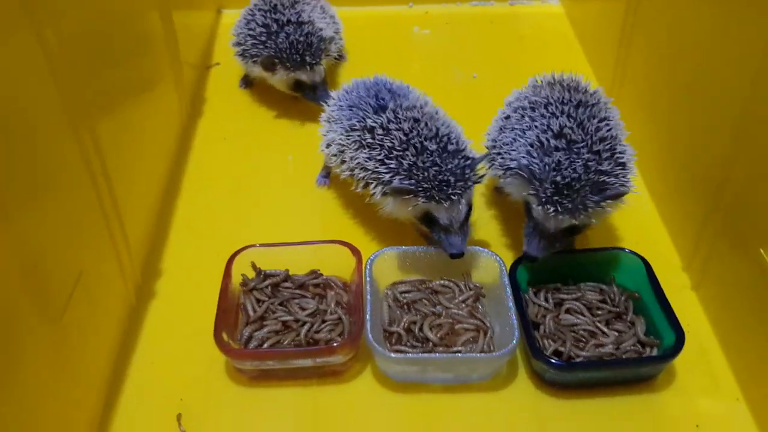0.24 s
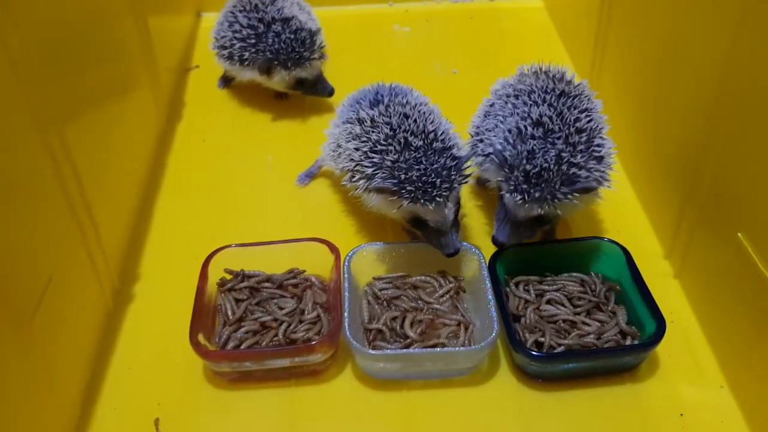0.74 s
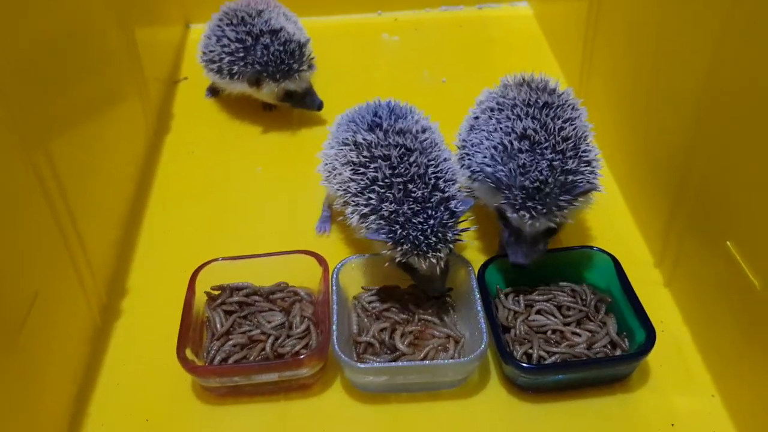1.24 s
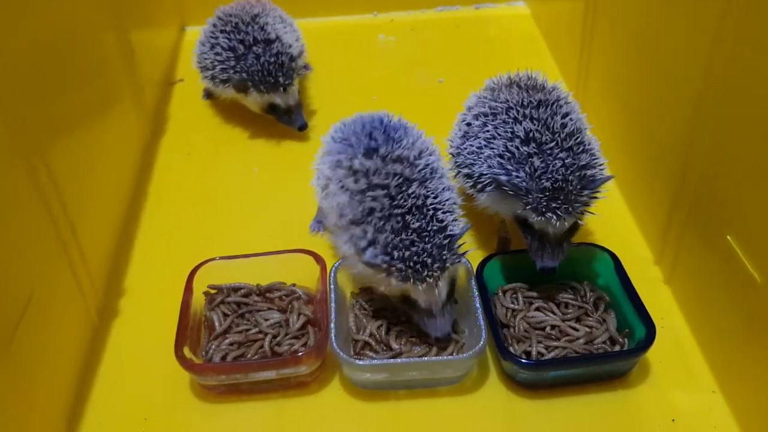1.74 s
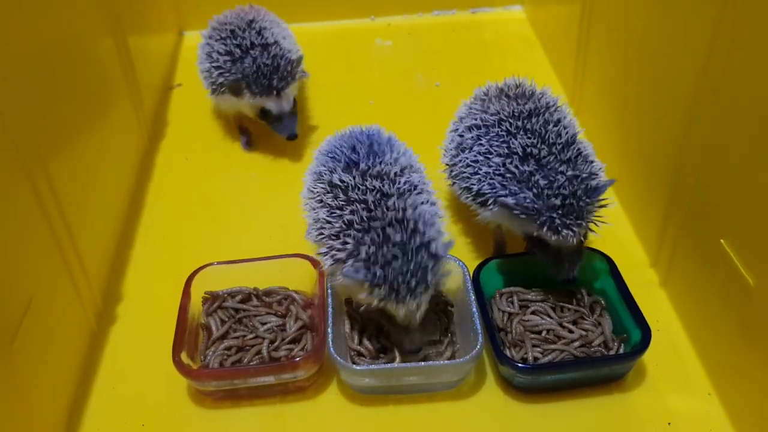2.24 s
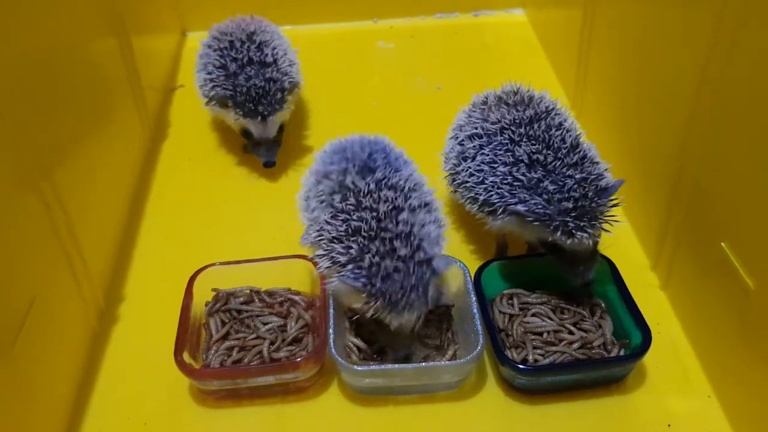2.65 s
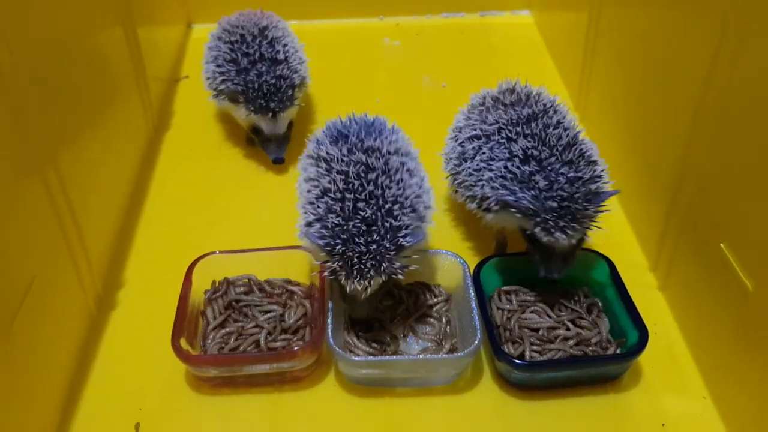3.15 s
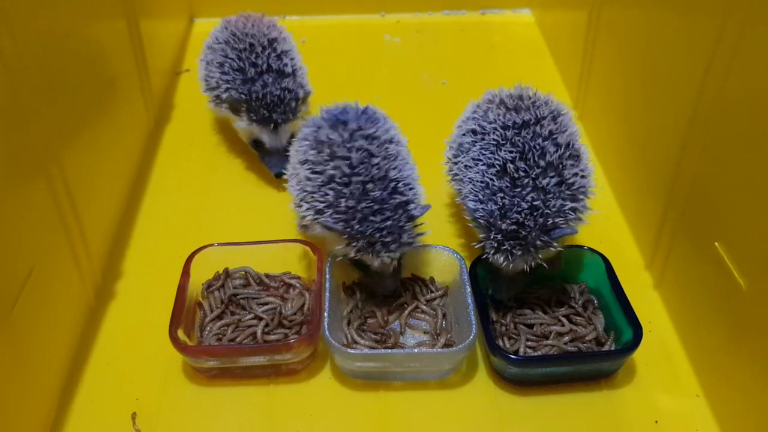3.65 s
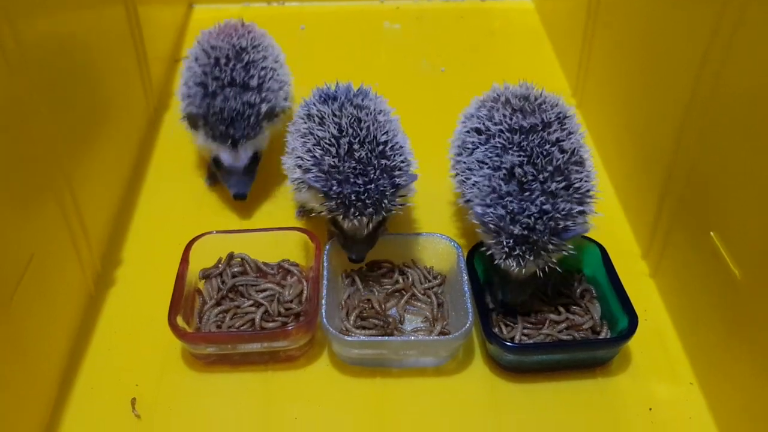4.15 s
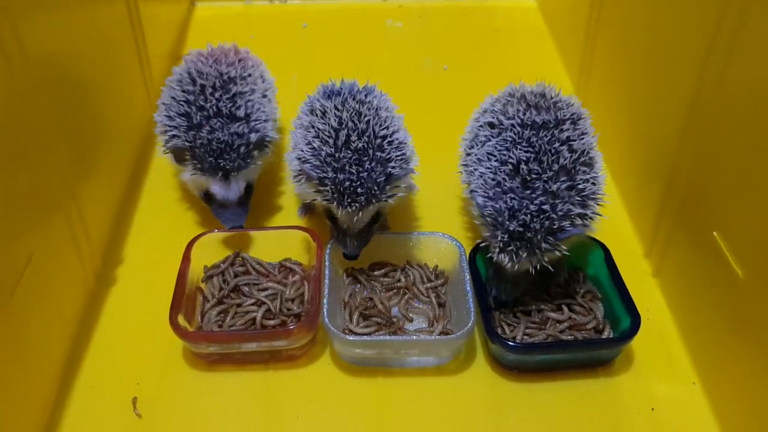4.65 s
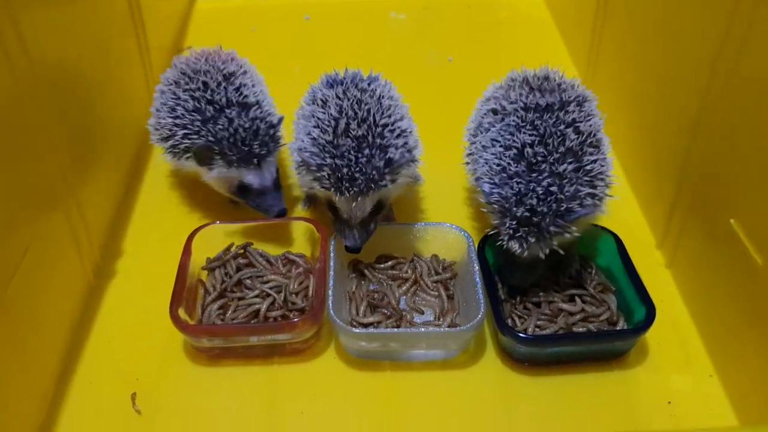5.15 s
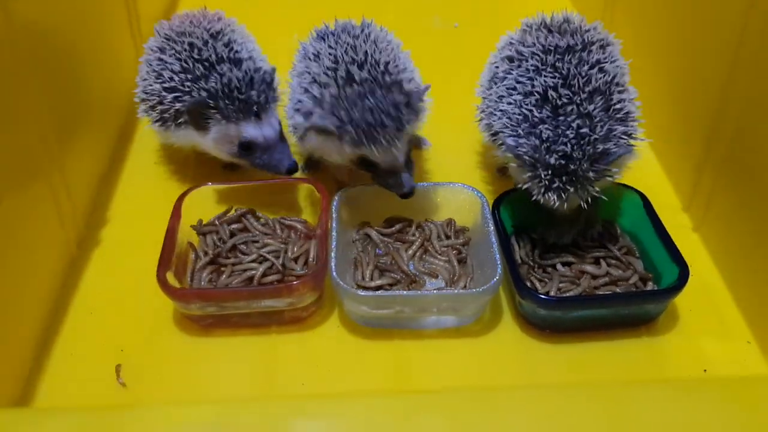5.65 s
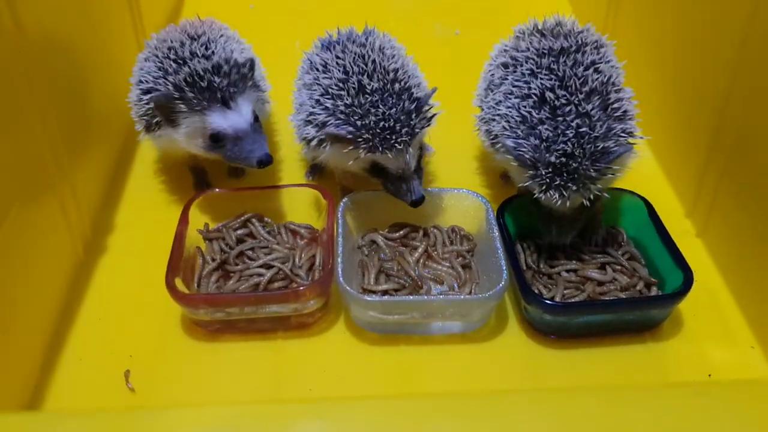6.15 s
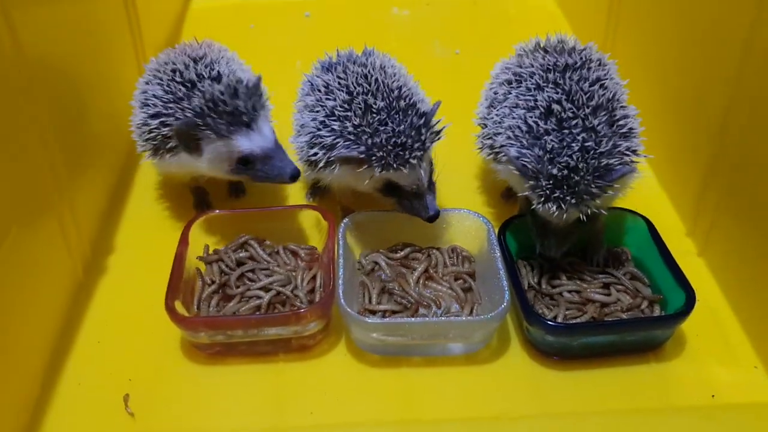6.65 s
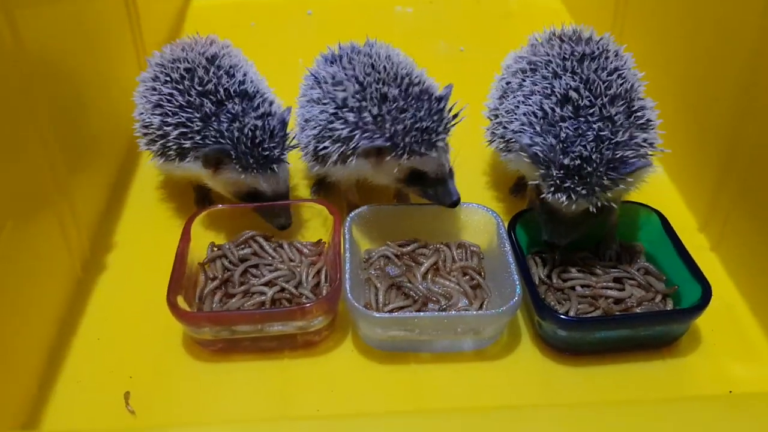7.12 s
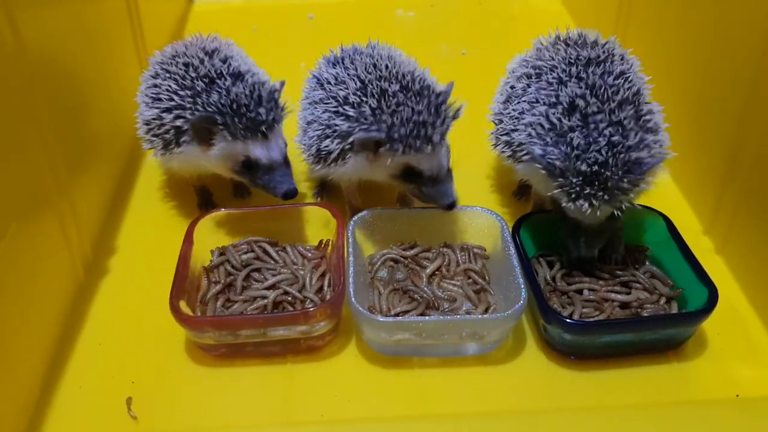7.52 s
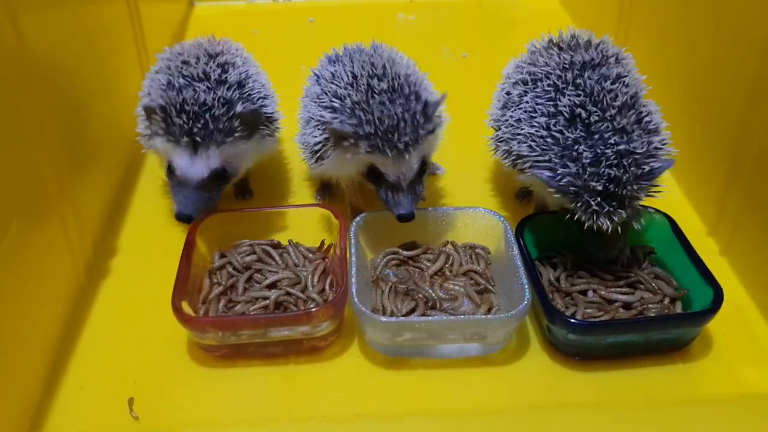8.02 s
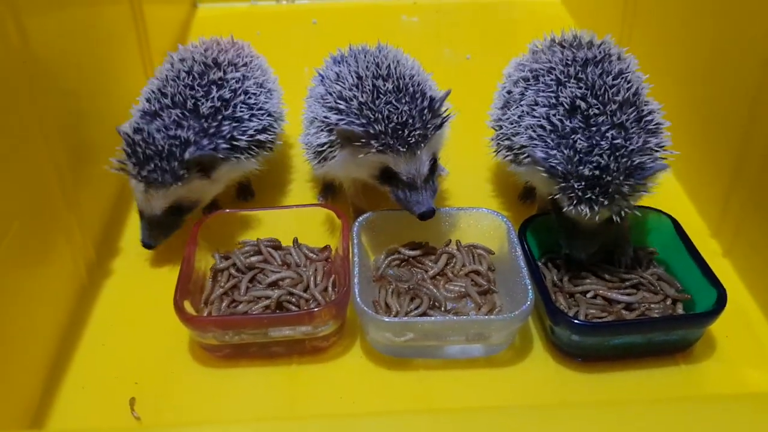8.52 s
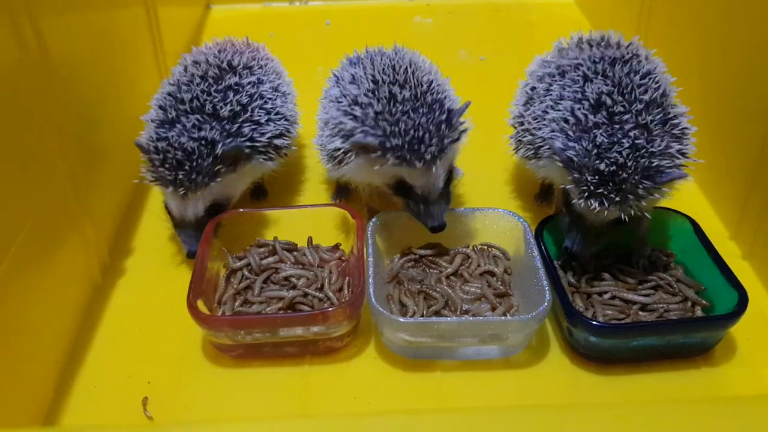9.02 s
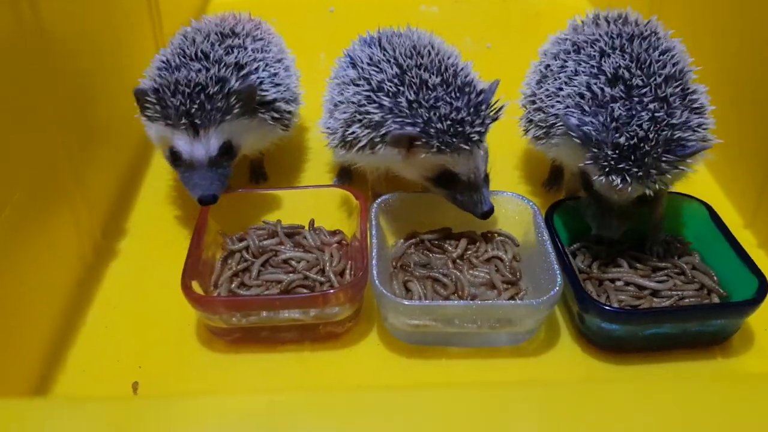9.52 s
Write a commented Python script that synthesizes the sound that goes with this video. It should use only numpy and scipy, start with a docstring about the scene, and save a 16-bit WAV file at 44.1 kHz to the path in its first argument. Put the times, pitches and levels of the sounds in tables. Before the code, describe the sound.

Small crisp chewing and dry rustling from feeding hedgehogs, with light dish knocks, a humming fan and three late microphone bumps.

```python
"""Three hedgehogs crunch dried mealworms, their teeth cracking the brittle shells.
They eat from small dishes in a plastic tub: snouts sniff, dig in the heap, snap dry worms
and nudge the dishes against the tub floor. Behind them, air rushes and a fan hums and whines.
Late on, three taps land on the camera by its left microphone, and its automatic volume
control turns everything down a little."""
import sys
import numpy as np
from scipy import signal
from scipy.fft import rfft, irfft, next_fast_len
from scipy.io import wavfile

SR = 44100
rng = np.random.default_rng(int(sys.argv[2]) if len(sys.argv) > 2 else 0)


def store_wav(level_fs):
    """Save 16-bit WAV to argv[1]."""
    pcm = np.round(np.clip(np.atleast_2d(level_fs), -1, 1) * 32767)
    wavfile.write(sys.argv[1], SR, pcm.T.astype(np.int16))


N = 431298
TIME = np.arange(N) / SR
SHORT = TIME[:8192]  # the clock for one short sound, in seconds


def undb(db):
    """Turn decibels into a number to multiply by."""
    return 10 ** (np.asarray(db) / 20)


def unit(x):
    """Scale a sound so its average strength (rms) is 1."""
    return x / np.sqrt(np.mean(x ** 2))


def peak(x):
    """Scale a sound so its biggest swing is 1."""
    return x / np.abs(x).max()


def curve(rows):
    """Join (time_s, value) points with straight lines."""
    return np.interp(TIME, *np.transpose(rows))


def by_pitch(rows, f):
    """Read between (pitch_hz, value) points, giving each octave equal room."""
    hz, value = np.transpose(rows)
    return np.interp(np.log(f), np.log(hz), value)


def shape(x, response):
    """Filter a sound: response(f) says how much of each frequency gets through."""
    size = next_fast_len(x.shape[-1], True)
    f = np.maximum(np.fft.rfftfreq(size, 1 / SR), 1)
    return irfft(rfft(x, size) * response(f), size)[..., :x.shape[-1]]


def resonance(f, hz, width):
    """Favour the frequencies near hz, as a ringing object does; narrower rings longer."""
    return 1 / (1 + 1j * (f * f - hz * hz) / (f * width))


def soften(x, hz):
    """Smooth away what lies above hz, as a soft contact does."""
    return signal.sosfilt(signal.butter(2, min(hz, SR / 3), fs=SR, output="sos"), x)


def fade(fade_s):
    """Die away by 60 dB in fade_s seconds."""
    return np.exp(-np.log(1000) * SHORT / fade_s)


def waver(rate_hz):
    """A smooth random wobble, about 1 in size."""
    return unit(shape(rng.standard_normal(N), lambda f: np.exp(-(f / rate_hz) ** 2)))


def pan(left_db):
    """Make the left ear left_db louder than the right."""
    return undb(np.array([[left_db], [-left_db]]) / 2)


def add(track, start_s, sound):
    """Mix a sound into the track at start_s."""
    start = int(start_s * SR)
    track[:, start:start + sound.shape[-1]] += sound[..., :N - start]


def grains(size, per_s, spread_db):
    """Tiny clicks of uneven strength at random moments."""
    strengths = undb(spread_db * np.minimum(rng.exponential(size=size), 4))
    return (rng.random(size) < per_s / SR) * strengths * rng.standard_normal(size)


def tub_echo(x, walls_db, walls_fade_s, room_db, room_fade_s):
    """Add quick echoes off the tub walls, then the faint room; each ear hears its own."""
    walls = rng.standard_normal((2, len(SHORT))) * fade(walls_fade_s) * (SHORT > .001)
    room = rng.standard_normal((2, len(SHORT))) * fade(room_fade_s) * (SHORT > .01)
    echo = undb(walls_db) * unit(walls) + undb(room_db) * unit(room)
    return x + signal.fftconvolve(x, echo / np.sqrt(len(SHORT)), axes=-1)[:, :N]


# How alike the room sounds in the two ears: pitch_hz, likeness (1 = the same)
EAR_LIKENESS = [(60, 0.98), (290, 0.85), (640, 0.3), (1300, 0.023)]
def room_noise(response):
    """Filtered noise whose low notes are alike in both ears and whose high notes are not."""
    shared = shape(rng.standard_normal(N), lambda f: response(f) * np.sqrt(1 + by_pitch(EAR_LIKENESS, f)))
    apart = shape(rng.standard_normal(N), lambda f: response(f) * np.sqrt(1 - by_pitch(EAR_LIKENESS, f)))
    return unit(np.array([shared + apart, shared - apart]))


# The air's balance of low and high: pitch_hz, relative_db
AIR_BALANCE = [(20, -40), (32, -23), (50, -5.5), (92, -2.5), (155, -1.5), (260, -6), (440, -17), (590, -17),
               (760, -16), (2250, -15.5), (3400, -32.5), (6800, -31.5), (8600, -49.5), (11500, -40),
               (14500, -87)]
# The depth of a hollow in the air's sound: time_s, change_db
AIR_HOLLOW = [(0, -1), (4.6, -4), (6.2, -10), (9.78, -10.5)]
def room_air(level_db=-46):
    """Air rushes softly; a narrow hollow in its middle range deepens halfway through."""
    air = undb(level_db) * room_noise(lambda f: undb(by_pitch(AIR_BALANCE, f)))
    middle = shape(air, lambda f: resonance(f, hz=587, width=100))
    return air - (1 - undb(curve(AIR_HOLLOW))) * middle


# The bands of noise in the fan's drone: pitch_hz, width_hz, relative_db
FAN_BANDS = [(60.6, 8.3, -53.5), (109.7, 9.8, -51.5), (204, 4.8, -50), (236.7, 3.9, -57),
             (291.3, 9.2, -64.5), (326.8, 21, -57.5), (383, 7.2, -62.5), (410, 11, -65), (513, 22, -71),
             (779, 18, -65.5), (1707, 250, -60), (2350, 26, -63), (2802, 134, -67), (4890, 51, -73.5),
             (12150, 90, -88)]
# The fan's two strongest tones: pitch_hz, relative_db
FAN_TONES = [(202.5, -1), (236.3, -4)]
# The slow swell of those tones: time_s, level_db
FAN_SWELL = [(0, -49), (1.1, -50.5), (2.0, -46), (4.7, -48), (5.8, -43.5), (7.0, -43.5), (8.2, -47.5),
             (9.78, -44.5)]
def fan(drone_db=-46.5, wobble_hz=2.573):
    """A ventilation fan drones in narrow bands of noise and hums two wavering tones."""
    def bands(f):
        return np.sqrt(sum(undb(db) ** 2 / width * np.abs(resonance(f, hz, 1.31 * width)) ** 4
                           for hz, width, db in FAN_BANDS))

    drone = undb(drone_db) * room_noise(bands)
    tones = np.zeros(N)
    for pitch_hz, relative_db in FAN_TONES:
        strength = undb(relative_db + 3.2 * waver(6))
        cycles = np.cumsum(pitch_hz + wobble_hz * waver(12.84)) / SR
        tones += strength * np.sin(2 * np.pi * cycles)
    return drone + unit(tones) * undb(curve(FAN_SWELL) - 1) * pan(1)


# A thin whine that sinks away halfway through: time_s, level_db
WHINE_LEVEL = [(0, -76), (1.2, -70), (4.2, -68.5), (5.1, -71), (5.7, -76.5), (7.5, -85), (9.78, -80)]
def whine(pitch_hz=2805, wobble_hz=2.5, flutter_db=2):
    """One thin, slightly unsteady tone flutters differently in each ear."""
    cycles = np.cumsum(pitch_hz + wobble_hz * waver(11.2)) / SR
    tone = np.sqrt(2) * np.sin(2 * np.pi * cycles)
    flutter = np.array([waver(4.5), waver(15)])
    return tone * undb(curve(WHINE_LEVEL) + flutter_db * flutter)


# Taps on the camera: start_s, thump_db, thump_hz, thump_width_hz, hardness_hz, case_hz,
# case_width_hz, case_db, tube_db, scrape_db, scrape_delay_s, scrape_spread_s
CAMERA_TAPS = [(7.0755, -1.2, 400, 500, 9400, 1440, 3560, -12, -9.5, -31, .012, .019),
               (7.1468, -2.5, 350, 386, 3140, 5560, 3900, -9, -1, -49, .011, .02),
               (8.123, 2, 350, 160, 1590, 3950, 1500, -17.5, -26.5, -36, .014, .007)]
def camera_taps(right_db=-26, boom_db=-23, tube_lag_s=.0002, bounce_s=.0134, bounce_db=-21):
    """A tap thumps the left microphone, booms in the camera's body, ticks, bounces and slides off."""
    out = np.zeros((2, N))
    sides = undb([[0], [right_db]])
    for (start_s, thump_db, thump_hz, thump_width_hz, hardness_hz, case_hz, case_width_hz,
         case_db, tube_db, scrape_db, scrape_delay_s, scrape_spread_s) in CAMERA_TAPS:
        hit = -1. * (SHORT == 0)
        push = soften(soften(hit, hardness_hz), hardness_hz)
        boom = peak(shape(push, lambda f: resonance(f, 165, 130)))
        thump = peak(shape(push, lambda f: resonance(f, thump_hz, thump_width_hz))) + undb(boom_db) * boom
        # the case ticks first, then the tiny tube leading to the microphone
        case = shape(hit, lambda f: resonance(f, case_hz, case_width_hz) ** 2)
        tube = shape(hit, lambda f: resonance(f, 12300, 4900) ** 2 * np.exp(-2j * np.pi * f * tube_lag_s))
        ticks = undb(case_db) * peak(case) + undb(tube_db) * peak(tube)
        rubbing = shape(grains(len(SHORT), per_s=8000, spread_db=-9), lambda f: resonance(f, 710, 1300))
        slide = np.exp(-((SHORT - scrape_delay_s) / scrape_spread_s) ** 2)
        scrape = undb(scrape_db) * unit(soften(rubbing, 9300)) * slide
        add(out, start_s, (undb(thump_db) * thump + ticks + scrape) * sides)
        add(out, start_s + bounce_s, undb(thump_db + bounce_db) * soften(thump, thump_hz) * sides)
    return out


# The notes a dish rings with: pitch_hz, relative_db, fade_s
DISH_NOTES = [(330, -3, .03), (535, -.5, .05), (660, -10, .03), (890, 0, .048), (1040, -4, .03),
              (1250, -5.5, .025), (1430, -7, .025), (1720, -2, .025), (1950, -4, .025), (2400, -7, .025),
              (3500, -9, .02), (4450, -9, .025), (6030, -11, .025), (6900, -4, .012)]
# Dishes knocking on the tub floor: start_s, level_db, hardness_hz, rocking_s, clack_db
DISH_KNOCKS = [(1.158, -61, 900, .017, 0), (2.455, -53, 1700, 0.02, -3), (2.481, -47, 1180, 0.04, -1),
               (2.713, -47, 1400, 0.017, -11), (2.848, -47, 1790, 0.023, -5), (2.907, -46, 1670, .017, -7),
               (2.961, -39.5, 8800, 0.0091, -2), (3.135, -54.5, 900, 0.018, -2),
               (3.151, -47.5, 1050, 0.016, -4), (3.626, -50.5, 1100, .0032, -6), (4.223, -52, 985, .03, 0),
               (5.145, -66, 2200, 0.0024, -3), (6.577, -66, 800, .0044, -3), (7.01, -56, 1790, 0.0061, -1),
               (8.012, -63, 900, .004, -8), (8.185, -56, 520, 0.0053, -6)]
def dishes(rocking_db=-14, rattle_db=-7, onset_cycles=4):
    """A nudged dish hits the tub floor, rings and chatters as it settles."""
    out = np.zeros((2, N))
    for start_s, level_db, hardness_hz, rocking_s, clack_db in DISH_KNOCKS:
        hits = undb(rocking_db) * grains(len(SHORT), per_s=3600, spread_db=-6)
        hits *= np.exp(-SHORT / rocking_s)
        hits[0] = 1  # the knock itself
        ring = np.zeros((2, len(SHORT)))
        # each knock lands on another spot, so it rings a little differently
        for pitch_hz, relative_db, fade_s in DISH_NOTES:
            strength = undb(relative_db + rng.normal(0, 2))
            phase = 2 * np.pi * pitch_hz * rng.normal(1, .015) * SHORT + rng.normal(0, 1, (2, 1))
            ring += strength * fade(fade_s) * np.sin(phase)
        burst = rng.standard_normal((2, len(SHORT))) * (fade(.019) + undb(rattle_db) * fade(.5))
        clack = undb(clack_db) * shape(burst, lambda f: resonance(f, 1030, 1900))
        knock = signal.fftconvolve(ring + clack, hits[None])[:, :len(SHORT)]
        # a gentle nudge sounds dull and starts slowly, a hard one clacks
        onset = np.minimum(SHORT * hardness_hz / onset_cycles, 1)
        add(out, start_s, undb(level_db) * unit(soften(knock, hardness_hz) * onset))
    return tub_echo(out * pan(1.5), walls_db=-12, walls_fade_s=.03, room_db=-15, room_fade_s=.4)


# Short sniffs: middle_s, level_db
SNIFFS = [(.165, -51), (.812, -48.5)]
def sniffs(spread_s=.022):
    """A puff of air passes through a small snout, which favours two pitches."""
    air = shape(rng.standard_normal((2, N)),
                lambda f: resonance(f, 2340, 440) ** 2 + undb(-13) * resonance(f, 4400, 880) ** 2)
    puffs = sum(undb(db) * np.exp(-((TIME - middle_s) / spread_s) ** 2) for middle_s, db in SNIFFS)
    return unit(air) * puffs


# Dry worms snapping in the heap: start_s, level_db, body_db (against the tick), left_db
WORM_SNAPS = [(0.1233, -40.5, -4, 4), (.435, -53, -8, -1), (0.539, -46, -2, 3), (0.6167, -46, 0, 4),
              (.695, -50, -8, 5), (.787, -48, -8, 0), (1.018, -50, -14, 3), (1.059, -46, -17, 7),
              (1.088, -47, -2, -2), (1.349, -52, -8, 0), (1.5439, -38, -12, 1), (1.556, -39, -18, 0),
              (1.59, -47, -12, 4), (1.6601, -46, -6, -1.5), (1.674, -44, -12, 5), (1.736, -43.5, -16, -13),
              (1.801, -49, -7, 3), (1.8188, -45, -12, -7), (1.9964, -45, -4, 2), (2.182, -51, -6, -2),
              (2.194, -47, -10, 8), (2.2588, -45, -14, 4), (2.9602, -43, -9, 11), (3.1305, -40.5, -11, 3),
              (3.316, -50, -8, 6), (3.4056, -43, -9, 12), (3.652, -39, -11, 6), (3.763, -53, -8, 6),
              (3.858, -42, -12, 5), (3.89, -48, -10, 6), (4.0557, -47, -11, 2.5), (4.071, -47, -2, 1),
              (4.239, -40, -6, 0), (4.283, -49, -8, 0), (4.5223, -38, -12, 11), (4.7274, -35.5, -13, 10),
              (4.752, -38, -12, 0), (4.822, -49, 3, 4), (4.8858, -47, -8, 2.5), (4.903, -49, 0, 0),
              (5.1776, -51, 0, 5.5), (5.219, -39, -4, 7), (5.507, -47, -6, 6), (5.5593, -43, -12, 5),
              (5.601, -44, -8, 3), (5.661, -41, -3, 3.5), (5.6984, -44, -4, 2.5), (5.7748, -40, -14, 1.5),
              (5.8, -44, -12, 4), (5.9175, -52, -6, 3), (5.9554, -38.5, -3, 2), (5.963, -44, -2, 4),
              (6.0298, -44, 1, 4), (6.69, -45, -14, 10), (7.326, -44, -1, 3), (7.358, -46, -6, 6),
              (8.546, -47.5, 1, -5), (8.966, -55, -10, 3), (9.017, -49, -1, 3)]
def worm_snaps(trim_db=-26):
    """A dry worm breaks with one sharp crack and a few splinters: a bright tick over a duller body."""
    out = np.zeros((2, N))
    for start_s, level_db, body_db, left_db in WORM_SNAPS:
        cracks = .4 * grains((2, len(SHORT)), per_s=3500, spread_db=-2) * fade(.022)
        cracks[:, 0] = 1  # the main break
        tick = unit(shape(cracks, lambda f: resonance(f, 12200, 5200) ** 3))
        body = unit(shape(cracks, lambda f: resonance(f, 5600, 4800) ** 3))
        add(out, start_s, undb(level_db + trim_db) * pan(left_db) * (tick + undb(body_db) * body))
    return tub_echo(out, walls_db=-7, walls_fade_s=.045, room_db=-12, room_fade_s=.24)


# A snout digs into the heap: start_s, length_s, level_db, left_db
SNOUT_DIGS = [(.13, 0.033, -63, 2), (0.614, 0.099, -69.5, 4), (1.065, .048, -67, 4),
              (1.455, 0.013, -60.5, -1), (1.515, 0.059, -62, 2), (1.64, 0.023, -64, 2),
              (1.78, .041, -62.5, 4), (2, .014, -62, 0), (2.26, .025, -63, 3), (2.714, 0.056, -65, 5),
              (2.902, 0.045, -63, 2), (3.096, 0.047, -63.5, 1), (3.164, .039, -66.5, 0),
              (3.642, 0.072, -64, 2), (3.836, 0.023, -61.5, -1), (4.041, 0.021, -61.5, 2),
              (4.25, 0.04, -63, 2), (4.445, 0.059, -67, 0), (4.519, .014, -63, -1), (4.735, 0.024, -64, 1),
              (5.186, 0.075, -63, 3), (5.55, 0.053, -62.5, -1), (5.655, 0.074, -62.5, 0),
              (5.763, 0.1, -66, 2), (6.026, .015, -58.5, 3), (6.654, 0.072, -74, 14),
              (7.342, 0.071, -65, 3), (8.176, 0.02, -59, 3), (8.35, 0.053, -63.5, -3)]
def dig_strength(rise_s=.0014, weaken_db_per_s=46, stop_s=.009, settle_db=-3.5, settle_s=.026):
    """How hard the heap is moved: a snout pushes in, eases off and stops, then the worms settle."""
    out = np.zeros((2, N))
    for start_s, length_s, level_db, left_db in SNOUT_DIGS:
        after_s = np.maximum(SHORT - length_s, 0)
        push = undb(-weaken_db_per_s * (SHORT - length_s / 2)) * np.exp(-after_s / stop_s)
        settle = undb(settle_db) * np.exp(-after_s / settle_s)
        strength = np.minimum(SHORT / rise_s, 1) * np.maximum(push, settle)
        add(out, start_s, undb(level_db) * pan(left_db) * strength)
    return out


# Restless stirring of the heap between digs: time_s, level_db
HEAP_STIR = [(0, -69.5), (.9, -73.5), (1.8, -70), (3.5, -69), (4.8, -67), (5.9, -74), (6.3, -74.5),
             (7.0, -69.5), (7.6, -75.5), (8.3, -67.5), (9.0, -75), (9.4, -86), (9.78, -90)]
# Jaws closing on what the snout finds: time_s, above_dig_db
CHEW_PER_DIG = [(0, 0.5), (2.1, 2), (2.8, 9), (9.78, -0.5)]
# How hard the hedgehogs chew: time_s, effort_db
CHEW_EFFORT = [(0, -69), (2.1, -50), (2.5, -41), (3.6, -37.5), (4.8, -38), (5.7, -42), (6.5, -42),
               (7.3, -40.5), (8.4, -40), (9.78, -42)]
def rustle_and_grind(grind_db=-28.5):
    """Dry worms slide over each other with a fine, bright rustle; jaws grind them with a duller one."""
    rustle = shape(grains((2, N), per_s=1900, spread_db=4), lambda f: resonance(f, 11150, 5400) ** 4)
    grind = shape(grains((2, N), per_s=1100, spread_db=4), lambda f: resonance(f, 5150, 10500) ** 3)
    digs = dig_strength()
    stirring = undb(curve(HEAP_STIR) + 3.2 * waver(13)) * pan(2.9)
    chewing = undb(curve(CHEW_EFFORT) + grind_db + 1.2 * waver(15)) * pan(4)
    # both sounds swell with each dig
    rustle = unit(rustle) * np.hypot(digs, stirring)
    grind = unit(grind) * np.hypot(undb(curve(CHEW_PER_DIG)) * digs, chewing)
    return tub_echo(rustle + grind, walls_db=-3, walls_fade_s=.05, room_db=-13, room_fade_s=.28)


def nibbles(strokes_per_s=3.8, unevenness=.28, nibble_db=-13):
    """Each uneven stroke of the jaws makes one small crack, listed like a row of SHELL_BITES."""
    gap, strength, pitch, place = rng.standard_normal((160, 4)).T
    start_s = np.cumsum(np.exp(unevenness * gap) / strokes_per_s)
    level_db = np.interp(start_s, *np.transpose(CHEW_EFFORT)) + nibble_db - 1.5 * strength
    pitch_hz = 6200 * 2 ** (.16 * pitch)
    left_db = 10 + 3 * place
    return [row for row in zip(start_s, level_db, pitch_hz, left_db) if row[0] < TIME[-1]]


# The clearest cracks of shell between the teeth: start_s, level_db, pitch_hz, left_db
SHELL_BITES = [(.105, -42.5, 6900, -8), (1.06, -40, 6800, 1), (1.348, -44.5, 6500, -2),
               (1.464, -39, 4200, 7), (2.182, -45, 6700, 0), (2.256, -37, 7380, -2),
               (2.315, -43.5, 5500, 13), (2.438, -46, 5040, 8), (2.479, -47, 4650, 7),
               (2.513, -47, 6550, 3), (2.61, -49, 4520, 11), (2.73, -36, 6050, 7), (2.8458, -27, 4400, 7),
               (2.848, -36, 6300, 6), (2.9066, -40, 4650, 7), (3.106, -45, 6550, 2), (3.348, -49, 6550, -1),
               (3.432, -46, 5500, 7), (3.479, -45.5, 5700, 5), (3.508, -47, 4970, 7),
               (3.585, -45, 6550, -4), (3.679, -37.5, 6400, 3.5), (3.704, -38.5, 5660, 8),
               (3.73, -46, 5000, 7), (3.7604, -43, 5270, 4), (3.858, -38, 5500, 10), (4.031, -37, 6460, 3),
               (4.259, -34.5, 6350, 1), (4.3497, -36, 6650, -1), (4.4872, -36, 6700, -2),
               (4.535, -44, 6550, 0), (4.6612, -34, 6900, -1), (4.727, -31.5, 6900, 5),
               (4.929, -38.5, 6000, 3), (5.005, -46, 6050, 2), (5.022, -46, 5700, 4),
               (5.188, -43.5, 5660, 3), (5.219, -45, 6150, -1), (5.244, -46, 4800, 1),
               (5.3336, -38.5, 6300, 6), (5.479, -50.5, 5700, 1), (5.599, -37.5, 6330, 0),
               (5.659, -39, 4600, 6), (5.678, -41, 4550, 6), (5.699, -37, 4670, 5), (5.725, -42, 5960, 4),
               (5.822, -43, 4410, 6), (5.851, -47, 4300, 7), (5.902, -46, 5470, 2), (5.917, -34.5, 4560, 3),
               (5.962, -48, 4890, 8), (6.0296, -34, 6600, 3), (6.051, -45, 4480, 6), (6.158, -40, 4070, 4),
               (6.306, -45, 6030, 0), (6.3627, -43.5, 5330, 7), (6.476, -47, 4840, 10),
               (6.633, -43.5, 6700, 5), (6.688, -36, 5450, 9), (6.819, -41.5, 6250, -3),
               (6.9146, -46, 5100, 11), (7.006, -41.5, 6200, 10), (7.172, -48, 4800, 11),
               (7.249, -43, 5700, 2), (7.2807, -34.5, 6000, 9), (7.3741, -45, 4820, 8),
               (7.385, -46, 4800, 2), (7.426, -41, 6900, -5), (7.459, -43.5, 6700, -5),
               (7.478, -36.5, 6560, -3), (7.581, -43.5, 6700, 8), (7.847, -42, 6860, 2),
               (7.951, -38.5, 6200, .5), (8.082, -43, 4800, 6), (8.105, -40, 6000, -1),
               (8.187, -37, 7700, -3), (8.303, -44, 6550, 0), (8.395, -40.5, 5850, 6),
               (8.658, -41.5, 5630, -4), (8.761, -46, 6400, -1), (8.844, -45, 4850, 8),
               (8.859, -44.5, 4650, 8), (8.9598, -38.5, 5770, 2), (9.065, -30.5, 5960, -1),
               (9.327, -44.5, 5060, 9), (9.436, -43, 6550, 1), (9.5308, -39, 5660, 9),
               (9.656, -42.5, 7100, -10)]
def bites(crumbs_db=-27, snap_db=-3.5, trim_db=-26):
    """A shell gives way in a quick run of cracks that ring briefly at their own pitch; crumbs follow."""
    out = np.zeros((2, N))
    dying_away = fade(.022) + undb(crumbs_db) * fade(.13)
    for start_s, level_db, pitch_hz, left_db in SHELL_BITES + nibbles():
        cracks = grains((2, len(SHORT)), per_s=9000, spread_db=-3) * dying_away
        width_hz = 1600 * (pitch_hz / 5000) ** 2.15  # small, high pieces ring for a shorter time
        rings = shape(cracks, lambda f: resonance(f, pitch_hz, width_hz) ** 3)
        snaps = shape(cracks,
                      lambda f: resonance(f, 9700, 4600) ** 3 + undb(10.5) * resonance(f, 5260, 3700) ** 3)
        crunch = np.array([unit(ring) + undb(snap_db) * unit(snap) for ring, snap in zip(rings, snaps)])
        add(out, start_s, undb(level_db + trim_db) * pan(left_db) * crunch)
    return tub_echo(out, walls_db=-17, walls_fade_s=.072, room_db=-11.5, room_fade_s=.26)


def scene():
    """The room and the taps, plus the hedgehogs heard through the microphone's dip in the high notes."""
    background = room_air() + fan() + whine() + camera_taps()
    feeding = dishes() + sniffs() + rustle_and_grind() + bites() + worm_snaps()
    return background + shape(feeding, lambda f: 1 - 1.1 * resonance(f, hz=8390, width=690))


def record(dry, threshold_db=-14, squeeze=.14, recover_db_per_s=.5, top_hz=14600):
    """The volume drops after a loud peak and creeps back; overloads flatten and the top notes are cut."""
    level_db = 20 * np.log10(np.abs(dry).max(axis=0) + 1e-9)
    over_db = np.maximum(level_db - threshold_db, 0)
    recovery_db = recover_db_per_s * TIME
    held_db = np.maximum.accumulate(over_db + recovery_db) - recovery_db
    volume = undb(-squeeze * soften(held_db, 30))
    top_cut = signal.ellip(8, .2, 70, top_hz, fs=SR, output="sos")
    return signal.sosfilt(top_cut, np.clip(dry * volume, -1, 1))


dry = scene()
out = record(dry)
store_wav(out)
```